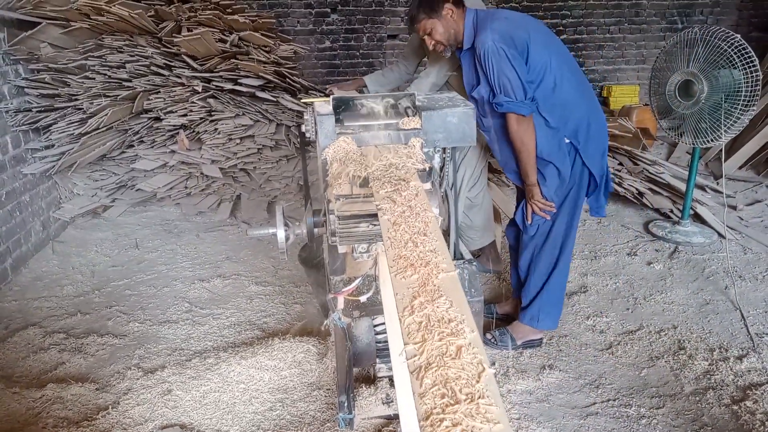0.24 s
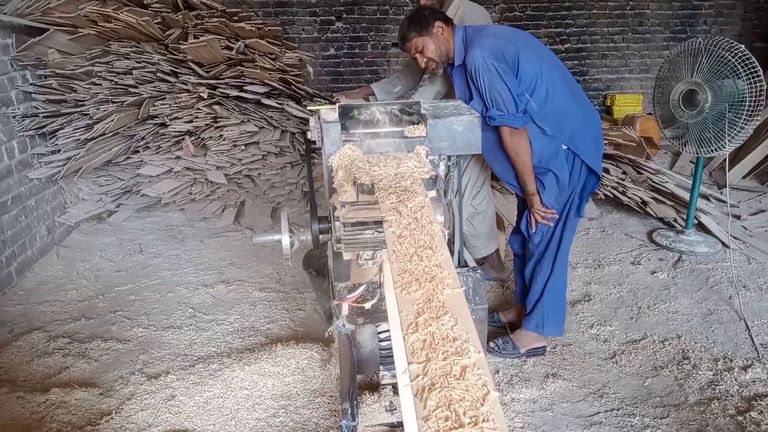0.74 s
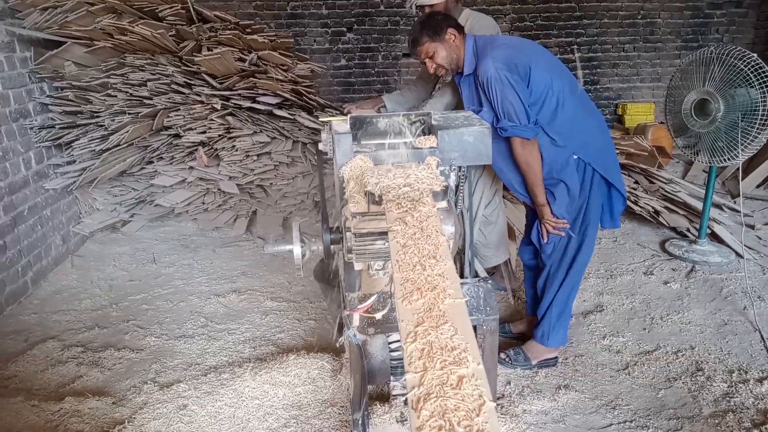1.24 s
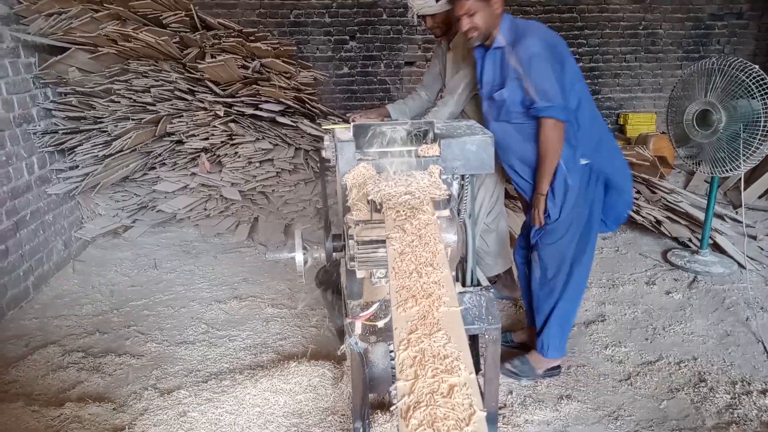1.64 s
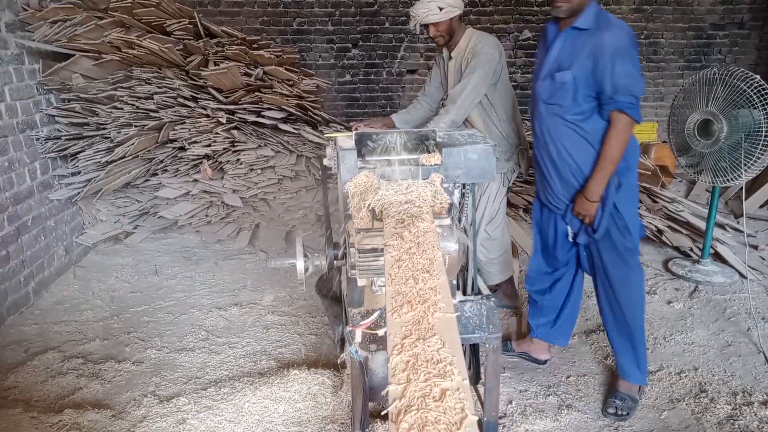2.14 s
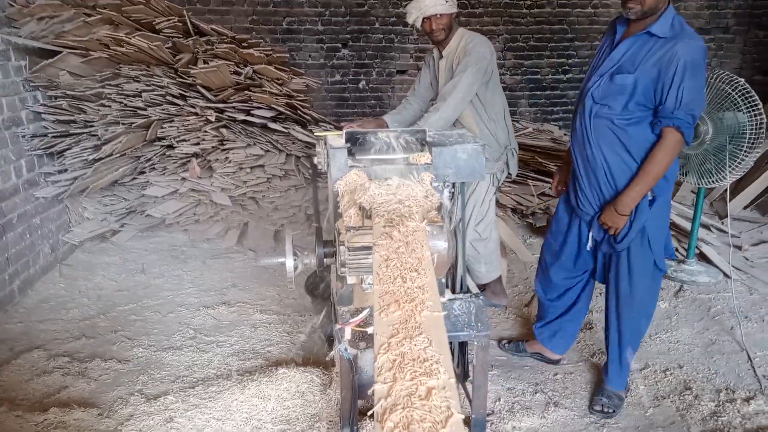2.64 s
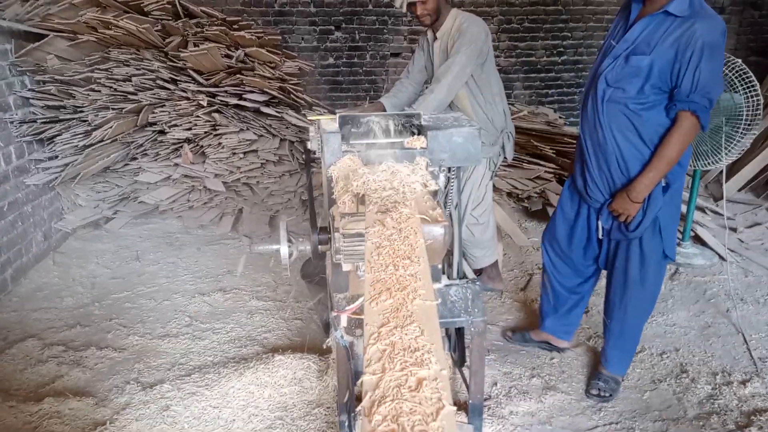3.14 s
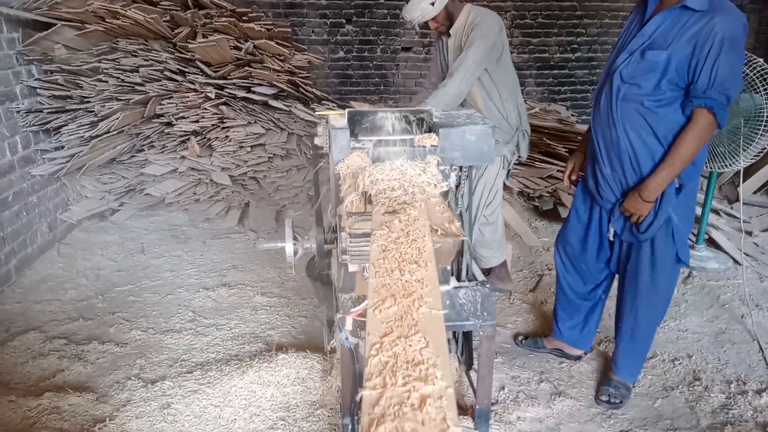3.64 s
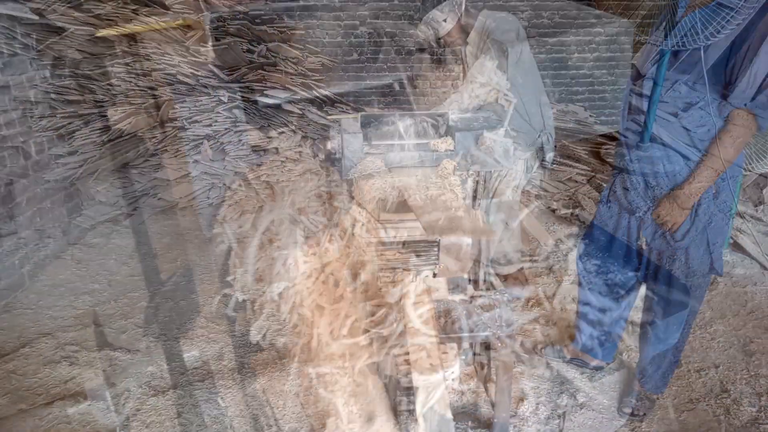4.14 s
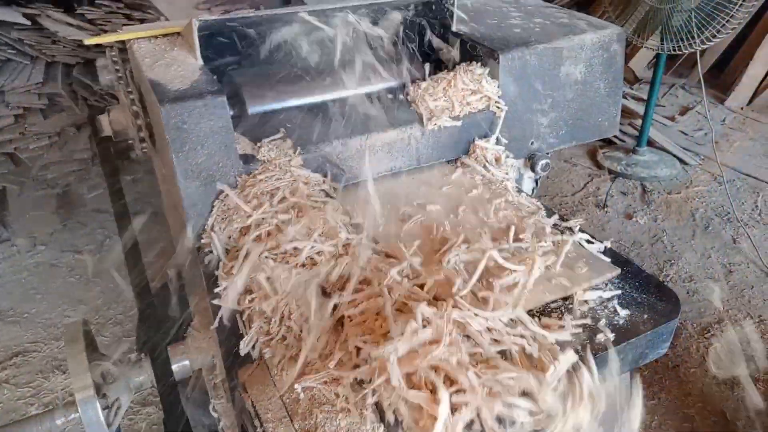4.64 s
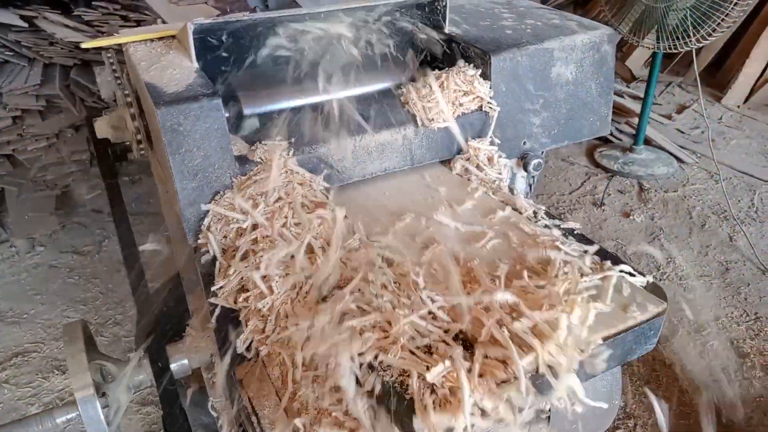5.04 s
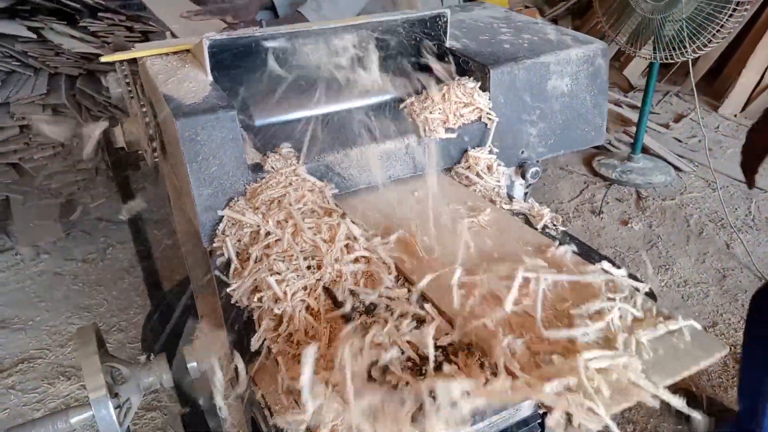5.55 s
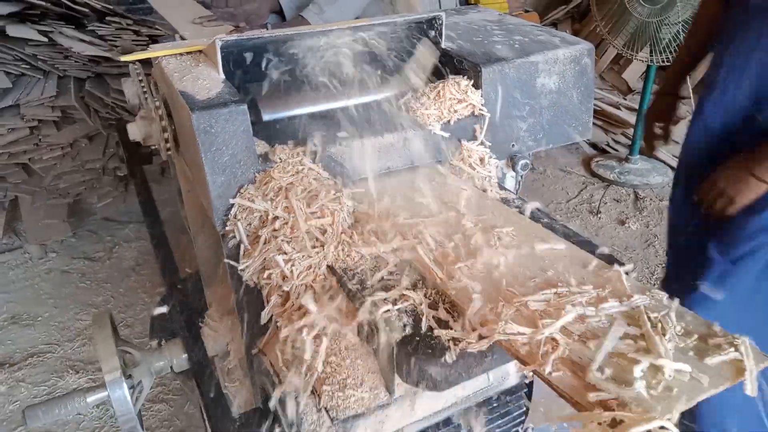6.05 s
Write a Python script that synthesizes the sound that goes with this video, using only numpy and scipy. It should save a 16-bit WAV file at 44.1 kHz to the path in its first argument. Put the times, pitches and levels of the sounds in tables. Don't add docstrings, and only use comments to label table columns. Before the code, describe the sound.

A thickness planer is already cutting at 0 s, heard from a few steps away in an open shed with a handheld microphone. A steady, slightly wavering whine sits around 3 kHz, over a coarse buzz of knocks, about 68 per second, uneven in strength with some sharp cracks. Torn wood fibres hiss and crackle. Dull microphone bumps come near 0.55, 1.9, 2.05 and 3.0 s; knocking briefly drops out at 0.8 s. From about 3.1 s the whine weakens and the chip spray turns brighter, with a short tonal swell at 3.6 s. Knocking slackens at 4.16 s, then a tiny gap at 4.25 s. The close view fades in over a third of a second: whistles near 1.8 and 2 kHz, thicker tearing noise, dense rattle. The knocks dip at 5.4 s, the cut eases around 5.6 s, the whistle peaks near 5.9 s and sinks as the cutting continues to the end.

```python
import sys
import numpy as np
from scipy import signal
from scipy.fft import rfft, irfft
from scipy.io import wavfile
from scipy.ndimage import uniform_filter1d, minimum_filter1d

SR = 44100
rng = np.random.default_rng(int(sys.argv[2]) if len(sys.argv) > 2 else 0)


def unload_wav(signal):
    wavfile.write(
        sys.argv[1],
        SR,
        np.round(np.clip(np.atleast_2d(signal).T, -1, 1) * 32767).astype(np.int16),
    )


def ratio_of_db(decibels):
    return 10 ** (np.asarray(decibels, float) / 20)


N = 276948
T = np.arange(N) / SR
FAR_END_S, NEAR_START_S = 4.2545, 4.2735
CONTROL_STEP = 64
# [f/Hz, level/dB per Hz]
NEAR_SHAVING_SPECTRUM = [(30, -53), (90, -25), (200, -17.5), (400, -2), (800, -2.5), (1000, -7.5),
                         (1350, 1.5), (1600, -11.5), (2500, -4), (3200, -1), (4500, -14), (5700, -25.5),
                         (7000, -47), (15600, -50)]


def far_planer(t):
    # [t/s, leading orders/dB, depth of cut/dB, knock/dB, turn towards outfeed/0-1]
    course = [(0.0, -31, -25, -21.5, 0.12), (0.45, -23, -26, -20.5, 0.07), (0.9, -28.5, -25.5, -18.5, 0),
              (1.25, -23.5, -24, -24.5, 0.11), (1.57, -22, -25.5, -19, 0.03), (2.1, -28, -26, -20.5, 0.21),
              (2.6, -31, -25.5, -23, 0.28), (3.05, -30, -29, -27, 0.55), (3.2, -41, -26.5, -24, 0.93),
              (3.9, -35, -25.5, -24, 0.75), (4.254, -22, -21, -22.5, 0.65)]
    # [order, level/dB]
    head_orders = [(1, -34), (2, -31), (3, -43), (4, -32), (5, -45), (6, -34), (7, -42), (8, -42), (9, -39),
                   (10, -39), (11, -39), (12, -37), (13, -47), (14, -38), (15, -33), (16, -30), (17, -22),
                   (18, -17), (19, -27), (20, -22), (21, -25), (22, -15), (23, -16), (24, -12), (25, -16),
                   (26, -18), (27, -16), (28, -11), (29, -13), (30, -14), (31, -9), (32, -8), (33, -16),
                   (34, -3), (35, -10), (36, -15), (37, -12), (38, -10), (39, -19), (40, -14), (41, -24),
                   (42, -15), (43, -25), (44, -21)]
    # [order, level/dB]
    buzz_orders = [(1, -45), (2, -40), (3, -45), (5, -42), (6, -36), (7, -38), (9, -32), (10, -23),
                   (11, -43), (12, -40), (13, -35), (14, -34), (16, -40), (17, -40), (18, -37), (20, -31),
                   (21, -37), (22, -33), (24, -31), (25, -27), (26, -28)]
    # [turn, t/s]
    turns = [(0, 0.0099), (48, 0.7164), (96, 1.4233), (144, 2.1301), (192, 2.8358), (240, 3.5414),
             (288, 4.2472)]
    # [delay/s, level/dB]
    echoes = [(.0021, -6), (.0043, -13), (.0073, -14)]
    # [f/Hz, level/dB per Hz]
    body_spectrum = [(500, -34.5), (1050, -24.5), (1500, -38.5), (2100, 4), (2350, 0.5), (3100, 1),
                     (3900, 1), (4170, -8.5), (4450, -4), (4850, -13), (5250, -6), (6000, -22.5),
                     (7200, -67), (15600, -25)]
    # [f/Hz, level/dB per Hz]
    sizzle_spectrum = [(5000, -3), (6500, -0.5), (7200, -18), (9000, -8.5), (10200, -18.5), (13200, -13),
                       (15600, -19.5)]
    # [f/Hz, level/dB per Hz]
    shaving_spectrum = [(30, -56), (90, -21), (200, -22), (500, -14.5), (680, -9), (1050, -27), (1300, -10),
                        (1600, -14.5), (2100, -15), (3100, 4), (4150, -6.5), (5200, -5.5), (7200, -36),
                        (15600, -72)]
    # [f/Hz, level/dB per Hz]
    spray_spectrum = [(200, -23), (400, -11), (800, -9), (1500, -13), (2300, 1), (3400, -1.5),
                      (5000, -26.5), (6500, -13.5), (9200, -22), (10200, -27), (13800, -18), (15600, -36)]
    knock = knocks(t, turns, echoes, body_spectrum, sizzle_spectrum,
                   beat_hz=23.15, beat_peak_s=3.04, spread_db=1.2, t60_s=.008, sizzle_db=-24.5, lead_s=.0004)
    shaving = shavings(t, shaving_spectrum, per_s=2000, grain_db=2.5, flutter_db=1.5)
    spray = shavings(t, spray_spectrum, per_s=3000, grain_db=2, flutter_db=1.5)
    return planer(t, course, 92.04, head_orders, buzz_orders, {34: 0.0}, knock, shaving, spray,
                  rest_db=-1.0, tear_db=-3.0, treble_db=-6.0, spray_db=-17)


def near_planer(t):
    # [t/s, leading orders/dB, depth of cut/dB, knock/dB, turn towards outfeed/0-1]
    course = [
        (4.274, -28, -14.5, -20.5, .5),
        (4.7, -22.5, -17.5, -21.5, 0.52),
        (5.049, -24, -17, -24, 0.52),
        (5.35, -19, -17, -21.5, 0.51),
        (5.64, -27.5, -20, -22, 0.34),
        (5.899, -17.5, -16, -24, 0.62),
        (6.28, -29.5, -20.5, -23, .5),
    ]
    # [order, level/dB]
    head_orders = [(1, -29), (2, -27), (3, -36), (4, -19), (5, -34), (6, -20), (7, -26), (8, -21), (9, -27),
                   (10, -20), (11, -22), (12, -15), (13, -22), (14, -13), (15, -20), (16, -19), (17, -18),
                   (18, -11), (19, -17), (20, 0), (21, -18), (22, 3), (23, -20), (24, -10), (25, -23),
                   (26, -10), (27, -23), (28, -10), (29, -30), (30, -16), (31, -18), (32, -12), (33, -18),
                   (34, -14), (35, -24), (36, -12), (37, -19), (38, -21), (39, -24), (40, -18), (41, -22),
                   (42, -20)]
    # [order, level/dB]
    buzz_orders = [(1, -49), (2, -46), (3, -43), (5, -27), (6, -18), (7, -24), (9, -20), (10, -16),
                   (11, -21), (12, -19), (13, -26), (14, -36), (16, -33), (17, -25), (18, -18), (20, -12),
                   (21, -26), (22, -21), (24, -16), (25, -19), (26, -17), (28, -14), (29, -20), (30, -16)]
    # [turn, t/s]
    turns = [(291, 4.2794), (336, 4.9408), (381, 5.6022), (426, 6.2638)]
    # [delay/s, level/dB]
    echoes = [(.0015, -13), (.0033, -15), (.0072, -15)]
    # [f/Hz, level/dB per Hz]
    body_spectrum = [(400, -27), (800, -4), (1000, -10), (1350, -9.5), (1600, -3), (2500, -4), (3200, 4),
                     (4300, -2.5), (5500, -16), (6200, -28.5), (15600, -50.5)]
    # [f/Hz, level/dB per Hz]
    sizzle_spectrum = [(5000, -5), (6500, 3.5), (7500, -8.5), (10000, -16), (12000, -7), (14000, -2),
                       (15600, -7.5)]
    # [f/Hz, level/dB per Hz]
    spray_spectrum = [(4000, -18), (6000, 5), (7500, -7), (10000, -10.5), (13500, -5), (15600, -3)]
    knock = knocks(t, turns, echoes, body_spectrum, sizzle_spectrum,
                   beat_hz=24.17, beat_peak_s=5.09, spread_db=1.5, t60_s=.005, sizzle_db=-38, lead_s=.0003)
    shaving = shavings(t, NEAR_SHAVING_SPECTRUM, per_s=2000, grain_db=2, flutter_db=1.2)
    spray = shavings(t, spray_spectrum, per_s=3000, grain_db=3, flutter_db=2.5)
    return planer(t, course, 92.25, head_orders, buzz_orders, {22: 0.0, 20: -3.5}, knock, shaving, spray,
                  rest_db=-9.5, tear_db=-8.5, treble_db=2.0, spray_db=-52.5)


def planer(t, course, head_hz, head_orders, buzz_orders, leads, knock, shaving, spray,
           rest_db, tear_db, treble_db, spray_db):
    s, *columns = np.transpose(course)
    whistle_db, cut_db, knock_db, facing = [np.interp(t, s, c) for c in columns]
    tone = whine(t, head_hz, head_orders, buzz_orders, leads, lead_db=whistle_db,
                 rest_db=cut_db + rest_db + 5.0 * facing, tilt_db_per_octave=-3.5 * facing)
    flare_db = 2.0 * every_sample(drift(8.6, len(t)), len(t))
    body, treble = knock
    blows = ratio_of_db(knock_db) * (body + ratio_of_db(treble_db + 16 * facing + flare_db) * treble)
    hiss = ratio_of_db(tear_db - 6 * facing) * shaving
    hiss = hiss + ratio_of_db(spray_db + 15 * facing + .6 * flare_db) * spray
    return tone + blows + ratio_of_db(cut_db + 0.21 * slack_db(t)) * hiss


def whine(t, head_hz, head_orders, buzz_orders, leads, lead_db, rest_db, tilt_db_per_octave):
    shaft_hz, buzz_db, wobble_hz, tilt_from_order = 68.02, -1.5, 0.03, 17
    speed_hz = head_hz + wobble_hz * every_sample(drift(3.8, len(t)), len(t))
    head = 2 * np.pi * np.cumsum(speed_hz) / SR
    shaft = 2 * np.pi * shaft_hz * t
    out = partial(10 * shaft + 2 * head, rest_db - 23.5, wander_db=4.5, rate_hz=3.0)
    for order, db in head_orders:
        if order in leads:
            out += partial(order * head, lead_db + leads[order], wander_db=1.85, rate_hz=12.0)
        else:
            lean_db = tilt_db_per_octave * np.log2(max(order / tilt_from_order, 1))
            level_db = rest_db + db + lean_db + swell_db(t, order * head_hz)
            out += partial(order * head, level_db, wander_db=.8 + .06 * order, rate_hz=4)
    for order, db in buzz_orders:
        level_db = rest_db + buzz_db + db + swell_db(t, order * shaft_hz)
        out += partial(order * shaft, level_db, wander_db=3, rate_hz=4)
    return out


def partial(phase, level_db, wander_db, rate_hz):
    slow_db = level_db[::CONTROL_STEP]
    wander = np.minimum(drift(rate_hz, len(phase)), 1.2)
    slow_db = slow_db + wander_db * wander[:len(slow_db)]
    sine = np.sin(phase + rng.uniform(0, 2 * np.pi))
    return np.sqrt(2) * every_sample(ratio_of_db(slow_db), len(phase)) * sine


def swell_db(t, hz):
    width_octaves = 0.16
    # [middle t/s, half length/s, centre f/Hz, lift/dB]
    swells = [
        (.9, 0.33, 686, 6),
        (1.45, 0.23, 2980, 5),
        (2.75, 0.74, 2730, 2),
        (3.623, 0.085, 2290, 11),
        (4.12, 0.12, 2500, 7.5),
        (4.62, 0.11, 3480, 8.5),
        (5.3, .2, 2500, 5.5),
        (3.8, 0.38, 1580, 3.5),
        (5.9, 0.17, 3000, -6),
    ]
    slow = t[::CONTROL_STEP]
    lift = 0
    for s, half_s, centre_hz, db in swells:
        octaves = np.log2(hz / centre_hz)
        lift = lift + db * np.exp(-((slow - s) / half_s) ** 2 - (octaves / width_octaves) ** 2)
    return np.repeat(lift, CONTROL_STEP)[:len(t)]


def knocks(t, turns, echoes, body_spectrum, sizzle_spectrum, beat_hz, beat_peak_s, spread_db, t60_s,
           sizzle_db, lead_s):
    same_share, sizzle_s, split_hz = .8, .0006, 6000
    turn, at_s = np.transpose(turns)
    times = np.interp(np.arange(turn[0], turn[-1] + 1), turn, at_s)
    chance = rng.standard_normal((len(times), 2))
    where = ((times - t[0] - lead_s + .00005 * chance[:, 1]) * SR).astype(int)
    blows = np.zeros(len(t))
    blows[np.clip(where, 0, len(t) - 1)] = ratio_of_db(
        knock_strength_db(times, chance[:, 0], beat_hz, beat_peak_s, spread_db))
    train = blows + sum(ratio_of_db(db) * np.roll(blows, int(lag_s * SR)) for lag_s, db in echoes)

    crack = rms_one(smear(train + 1e-18))
    rattle_decay = signal.lfilter([1], [1, -ratio_of_db(-60 / (t60_s * SR))], train)
    rattle = rms_one(rattle_decay * rng.standard_normal(len(t)))
    body = colour(np.sqrt(same_share) * crack + np.sqrt(1 - same_share) * rattle, body_spectrum)

    r = np.exp(-1 / (sizzle_s * SR))
    puff_swell = np.roll(signal.lfilter([1], [1, -2 * r, r * r], train), -20)
    puff = colour(puff_swell * rng.standard_normal(len(t)), sizzle_spectrum)
    low = signal.butter(4, split_hz, "low", fs=SR, output="sos")
    high = signal.butter(4, split_hz, "high", fs=SR, output="sos")
    return rms_one(signal.sosfilt(low, body)), ratio_of_db(sizzle_db) * rms_one(signal.sosfilt(high, puff))


def knock_strength_db(times, chance, beat_hz, beat_peak_s, spread_db):
    beat_swing_db, missed_share, missed_db = 2.0, .06, -9
    # [t/s, level over a usual knock/dB]
    hard_knocks = [(0.172, 4), (0.54, 6), (0.569, 6), (0.643, 4), (0.849, 5), (0.952, 4), (1.217, 6),
                   (1.35, 4), (1.512, 6), (2.012, 4), (2.071, 4), (2.601, 5), (2.659, 7), (2.762, 5),
                   (2.88, 5), (2.895, 6), (2.939, 6), (2.998, 8), (3.071, 6), (3.13, 6), (3.806, 4),
                   (3.865, 6), (4.309, 6), (4.544, 4), (4.735, 5), (5.088, 6), (5.352, 6), (5.632, 7),
                   (5.999, 5), (6.161, 6)]
    beat_db = beat_swing_db * np.cos(2 * np.pi * beat_hz * (times - beat_peak_s))
    db = np.clip(spread_db * chance - 1 + beat_db, -7, 2.0)
    db[rng.random(len(times)) < missed_share] = missed_db
    for s, hard_db in hard_knocks:
        db[abs(times - s) < .006] = hard_db
    return db + slack_db(times)


def slack_db(t):
    # [middle t/s, half length/s, level/dB]
    slack = [
        (0.801, 0.018, -15),
        (1.144, 0.019, 2),
        (4.16, .02, -12.5),
        (5.383, .03, -9.5),
    ]
    return sum(db * np.exp(-((t - s) / half_s) ** 4) for s, half_s, db in slack)


def smear(x):
    for lag, gain in ((11, .5), (29, -.4)):
        taps = np.zeros(lag + 1)
        taps[[0, -1]] = gain, 1
        x = signal.lfilter(taps, taps[::-1], x)
    return x


def shavings(t, spectrum, per_s, grain_db, flutter_db):
    n = len(t)
    torn = (rng.random(n) < per_s / SR) * ratio_of_db(grain_db * np.minimum(rng.exponential(1, n), 5))
    grains = rms_one(torn * rng.standard_normal(n)) + rng.standard_normal(n)
    flutter = every_sample(ratio_of_db(flutter_db * drift(13.5, n)), n)
    return rms_one(colour(grains * flutter, spectrum))


def bumps():
    tick_db, tick_s = -15, .001
    # [t/s, peak level/dB, f/Hz, push or pull/+-1]
    touches = [
        (0.5399, -15, 248, 1),
        (0.571, -19, 221, -1),
        (1.616, -32, 190, 1),
        (1.908, -25, 113, 1),
        (2.042, -13, 272, -1),
        (2.997, -21.5, 134, 1),
    ]
    out = np.zeros(N)
    for s, db, hz, sign in touches:
        cycles = np.maximum(T - s, 0) * hz
        thump = np.sin(2 * np.pi * cycles / (1 + 0.68 * cycles)) * np.exp(-1.2 * cycles)
        out += np.sign(sign) * ratio_of_db(db) * thump
        tick = (cycles > 0) * np.exp(-cycles / hz / tick_s) * rng.standard_normal(N)
        out += ratio_of_db(db + tick_db) * tick
    return signal.sosfilt(signal.butter(2, 70, "high", fs=SR, output="sos"), out)


def room_floor():
    return ratio_of_db(-102) * colour(rng.standard_normal(N), NEAR_SHAVING_SPECTRUM)


def rms_one(x):
    return x / np.sqrt(np.mean(x ** 2) + 1e-20)


def drift(rate_hz, count):
    settle = 1500
    r = np.exp(-2 * np.pi * rate_hz * CONTROL_STEP / SR)
    noise = rng.standard_normal(count // CONTROL_STEP + settle + 1)
    return rms_one(signal.lfilter([1], [1, -2 * r, r * r], noise)[settle:])


def every_sample(slow, count):
    return np.interp(np.arange(count) / CONTROL_STEP, np.arange(len(slow)), slow)


def colour(x, spectrum):
    hz, db = np.transpose(spectrum)
    bins_hz = np.arange(4097) * SR / 8192
    log_gain = np.interp(np.log(bins_hz + 1), np.log(hz), db) * np.log(10) / 20
    cepstrum = irfft(log_gain)
    cepstrum[1:4096] *= 2
    cepstrum[4097:] = 0
    impulse = irfft(np.exp(rfft(cepstrum)))[:4096]
    return signal.fftconvolve(x, impulse)[:len(x)]


def scene():
    fade_s, fade_start = 0.34, 0.054
    far_t, near_t = T[T < FAR_END_S], T[T >= NEAR_START_S]
    out = bumps() + room_floor()
    out[:len(far_t)] += far_planer(far_t)
    out[:len(far_t)] *= np.clip((FAR_END_S - .0013 - far_t) / .0015, 0, 1)
    fade_in = np.minimum(fade_start + (near_t - NEAR_START_S) / fade_s, 1)
    out[-len(near_t):] += fade_in * near_planer(near_t)
    return out[None]


def band_limit(x):
    return signal.sosfilt(signal.butter(12, 15760, fs=SR, output="sos"), x)


def record(dry):
    x = signal.sosfilt(signal.butter(2, 45, "high", fs=SR, output="sos"), dry)
    room_left = minimum_filter1d(np.minimum(1, .8 / (abs(x) + 1e-9)), size=129)
    limited = x * uniform_filter1d(room_left, size=65)
    return band_limit(limited)


dry = scene()
out = record(dry)
unload_wav(out)
```